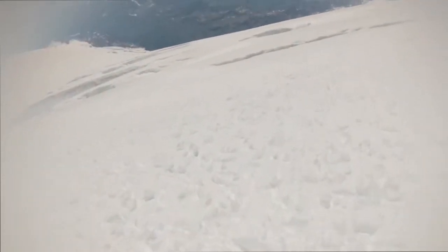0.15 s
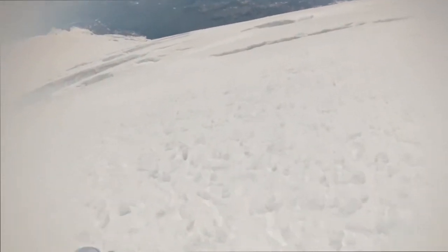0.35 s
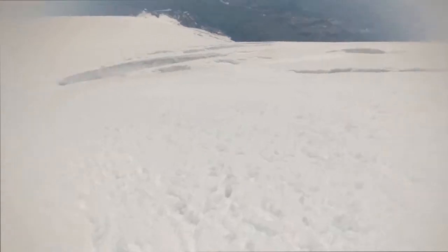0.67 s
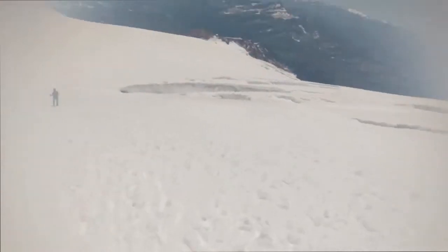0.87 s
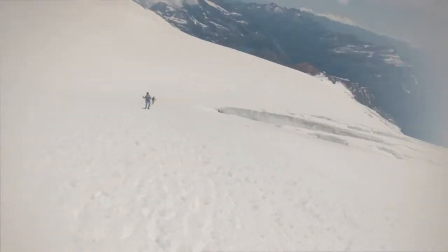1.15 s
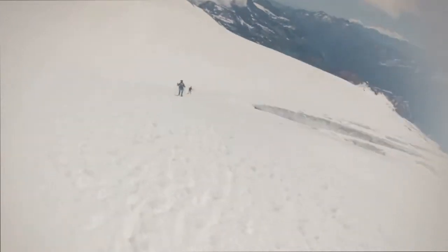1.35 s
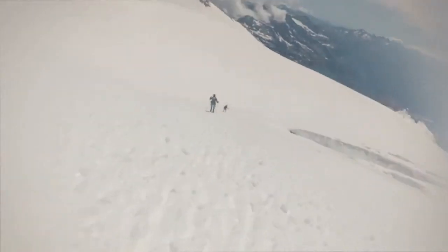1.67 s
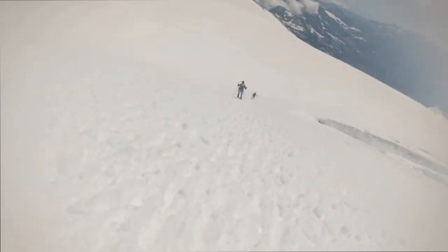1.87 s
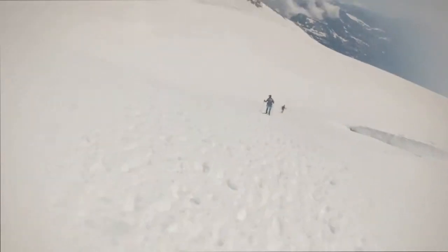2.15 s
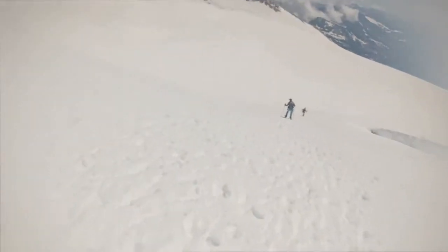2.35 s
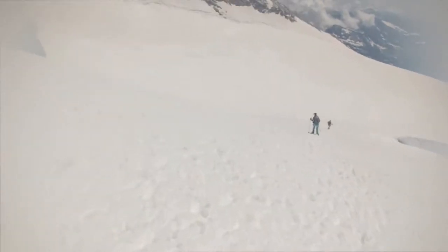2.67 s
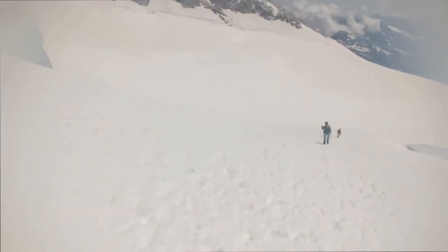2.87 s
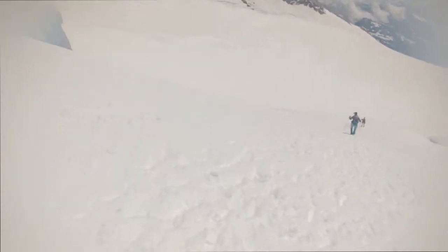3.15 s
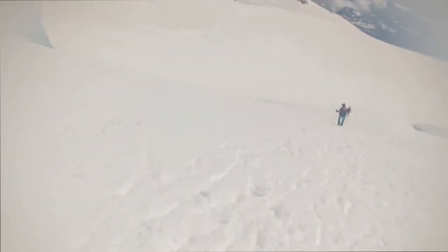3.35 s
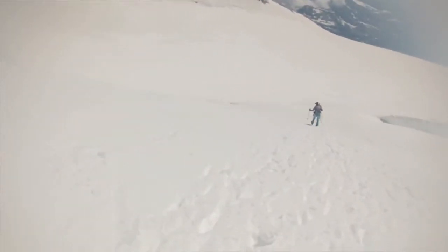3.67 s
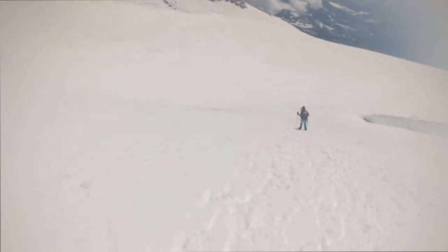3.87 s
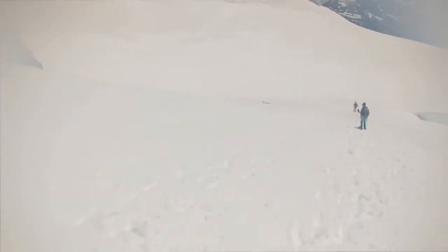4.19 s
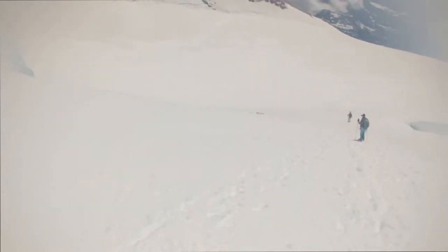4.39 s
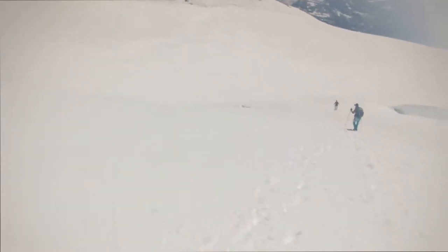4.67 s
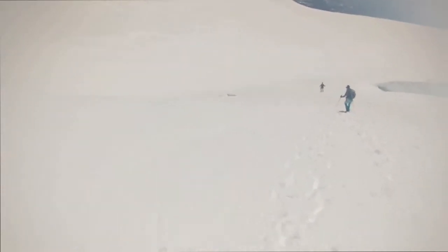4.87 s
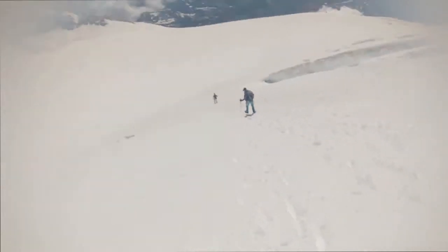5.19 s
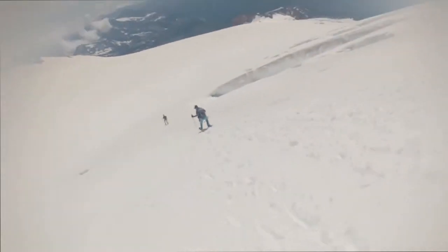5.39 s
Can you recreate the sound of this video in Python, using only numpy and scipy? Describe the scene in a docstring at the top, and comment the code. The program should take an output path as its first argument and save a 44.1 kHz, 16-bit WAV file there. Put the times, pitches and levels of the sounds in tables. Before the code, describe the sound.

Skis glide down soft snow with grainy hissing and small hollow knocks, under low wind that thumps hard during one turn.

```python
"""On soft, lumpy snow: a skier glides down with a small cased camera, its microphone close to the wind.
Filtered noise makes the low wind rumble, hardest near the end of a turn, and pulses add its buffets.
Scrapes of grainy noise mark the edges skidding; hiss and crunch are snow grains coloured by the case.
Short noise bursts, brief wavering tones and low, dull thumps stand out, most of them in the turn.
Smaller lumps knock and rattle the gear, a short hollow ring at the pitches of the case."""
import sys
import numpy as np
from scipy import signal
from scipy.fft import rfft, irfft
from scipy.io import wavfile
from scipy.ndimage import uniform_filter1d

SR = 44100
rng = np.random.default_rng(int(sys.argv[2]) if len(sys.argv) > 2 else 0)


def materialize(psi):
    """Save the field psi as 16-bit PCM at rate SR to the path in sys.argv[1].

    A 1-D psi becomes a single channel; in a 2-D psi each row is a channel.
    """
    bounded = np.clip(np.atleast_2d(psi).T, -1, 1)
    quanta = np.round(bounded * 32767).astype(np.int16)
    wavfile.write(sys.argv[1], SR, quanta)


N = 243873
TIME, FREQS = np.arange(N) / SR, np.fft.rfftfreq(N, 1 / SR)  # [s], [Hz]
SKID_SQUARENESS = 2.4  # 2 is a round swell, more is a firm bite and release

# Table levels are relative: the gain_db of a layer comes on top.
# eddies that hit the microphone head-on, suction negative:
# (time [s], peak pressure [full scale], length scale [s], roar level [dB])
EDDIES = [(1.063, 0.18, 0.012, -70), (1.264, 0.18, 0.017, -70), (1.367, -0.3, 0.012, -54.5),
          (1.403, -0.21, 0.0097, -53.5), (1.492, -0.3, 0.014, -52.5), (1.517, -0.26, .0095, -55.5),
          (1.621, -0.2, 0.018, -52), (1.67, -.25, 0.011, -59), (1.707, -0.31, 0.015, -53),
          (1.821, .27, 0.023, -48.5), (1.844, -0.19, 0.0091, -56.5), (2.621, -0.13, 0.02, -75),
          (5.36, 0.14, 0.012, -73)]
# the hardest knocks of the gear over lumps: (time [s], level [dB], ring pitch [Hz])
GEAR_KNOCKS = [(0.3223, -41, 1436), (1.256, -47.5, 1340), (1.683, -48.5, 1380), (1.7964, -39, 1346),
               (2.117, -50, 1380), (2.555, -38, 1415), (2.675, -42.5, 1397), (2.697, -47, 1370),
               (2.945, -38.5, 1375), (3.025, -45, 1370), (3.1172, -46.5, 1455), (3.3036, -43, 1360),
               (3.521, -42, 1365), (3.5955, -46, 1410), (3.909, -47, 1370), (4.153, -44, 1415),
               (4.3949, -39, 1387), (4.4394, -44, 1368), (4.6136, -43.5, 1430), (4.704, -45, 1360),
               (4.7403, -40.5, 1385), (5.017, -44, 1364), (5.1587, -46, 1410), (5.453, -49, 1370)]
# resonances of the case: (frequency [Hz], width [Hz], level [dB])
CASE_MODES = [(1158, 46, -9), (1375, 48, -0.5), (1526, 112, -7), (2054, 290, -11.5), (2363, 160, -6.5),
              (2490, 98, -29.5)]
# spectrum of the low rumble: (frequency [Hz], level [dB per Hz])
RUMBLE_SPECTRUM = [(3, -12.5), (8, 0.5), (16, -14), (25, 6.5), (38, -6), (56, -2.5), (72, -25),
                   (100, -36.5), (150, -45), (300, -64), (900, -130)]
# spectrum of hissing grains: (frequency [Hz], level [dB per Hz])
SPRAY_SPECTRUM = [(1800, -12.5), (2900, -17), (3150, -4), (3650, -12), (4000, 3), (4350, -8.5), (4800, 0),
                  (5300, 0), (5750, -9.5), (6200, -6.5), (6850, -2), (7100, -6), (7600, -5), (8800, -11),
                  (9500, -18), (10300, -26.5), (11100, -12), (12000, -29), (15000, -48.5)]
# moments when hiss and crunch dip: (time [s], dip [dB], half length [s])
HISS_DIPS = [(.88, -4.5, 0.049), (.985, -2, .012), (1.06, -6.5, 0.015), (1.224, -17, 0.016),
             (1.39, -6, 0.012), (1.617, -10, 0.011), (1.692, -14, 0.0088), (1.738, -9, 0.011),
             (1.89, -9, 0.066), (3.71, -5.5, 0.063), (5.33, -7.5, 0.075), (5.358, -20, 0.018)]
# edges skidding sideways: (time [s], scrape level [dB], spray level [dB], half length [s])
EDGE_SKIDS = [(0.22, -53.5, -75, 0.16), (0.534, -51, -90, 0.28), (1.108, -70, -65, .025),
              (1.266, -58.5, -77, 0.013), (1.455, -60, -64, .022), (1.548, -69, -61, .025),
              (1.662, -73, -52.5, 0.012), (1.813, -47.5, -53, 0.028)]


def amp(db):
    """Decibels to gain."""
    return 10 ** (np.asarray(db) / 20)


def unit(x):
    """Scales to rms 1."""
    return x / np.sqrt(np.mean(abs(x) ** 2) + 1e-20)


def level(rows):
    """A dB curve as a gain for every sample."""
    return amp(np.interp(TIME, *np.transpose(rows)))


def read(points):
    """Joins spectrum points on a log-frequency axis."""
    hz, value = np.transpose(points)
    return np.interp(np.log(FREQS + 1), np.log(hz + 1), value)


def colour(x, response):
    """Filters by a frequency response; rms 1."""
    return unit(irfft(rfft(x) * response, N))


def wobble(rate_hz):
    """Smooth random curve of rms 1, with changes mostly below the given rate."""
    return colour(rng.standard_normal(N), 1 / (1 + (FREQS / rate_hz) ** 4))


def hump(s, half_length, squareness=2):
    """A smooth swell of height 1 centred on the time s, down to 1/e at its half length."""
    away = abs((TIME - s) / half_length)
    near = away < 6
    out = np.zeros(N)
    out[near] = np.exp(-away[near] ** squareness)
    return out


def swells_db(rows):
    """Adds up smooth rises and dips in level."""
    return sum(db * hump(s, length) for s, db, length in rows)


def add(mix, s, sound):
    """Mixes a sound in at the time s."""
    part = mix[round(s * SR):][:len(sound)]
    part += sound[:len(part)]


def ports(pair):
    """Turns two unrelated signals into left and right, alike in the bass and less so in the treble."""
    # left-right likeness of the snow noise: (frequency [Hz], coherence [0-1])
    likeness = [(100, .9999), (450, 0.99), (1400, 0.99), (2400, 1), (3200, 0.96), (5000, 0.94),
                (7000, 0.78), (10000, 0.73), (15000, 0.19)]
    same = np.clip(read(likeness), 0, 1)
    mid, side = rfft(pair) * np.sqrt([(1 + same) / 2, (1 - same) / 2])
    return irfft([mid + side, mid - side], N)


def patchy(x, depth_db, size=7):
    """Turbulence and uneven snow make the bands of the spectrum flicker."""
    z = signal.stft(x, nperseg=512, noverlap=384)[2]
    field = rng.standard_normal(z.shape[1:])
    field = uniform_filter1d(field, size=size, axis=0)  # over frequency
    field = unit(uniform_filter1d(field, size=11, axis=1))  # over time
    return unit(signal.istft(z * amp(depth_db * field), nperseg=512, noverlap=384)[1][:, :N])


def wind_force():
    """The steady wind, lifted by each gust."""
    # steady wind pressure on the microphone: (time [s], level [dB])
    steady = [(0, -34.5), (.75, -33), (1.3, -26), (1.7, -29), (2.25, -31.5), (3.1, -34.5), (3.7, -37),
              (5.0, -37), (5.53, -30.5)]
    # gusts that swell the wind for a moment: (time [s], rise [dB])
    rises = [(.78, 2), (0.871, 5), (.97, 7.5), (1.22, 7), (2.0, 10), (2.899, 7), (3.371, 7), (4.08, 5),
             (4.48, 4.5), (5.21, 0), (5.35, 6.5)]
    gust_s = 0.039  # half length of a gust
    return level(steady) * amp(sum(db * hump(s, gust_s) for s, db in rises))


def wind(gain_db=1.0, steadiness=0.31, split_hz=42, usual_db=-32, deepening=0.26, surge_db=2.5):
    """Turbulent pressure, the same at both ports, coming in surges; stronger wind brings larger eddies."""
    eddies = colour(rng.standard_normal(N), amp(read(RUMBLE_SPECTRUM)))
    power = uniform_filter1d(abs(signal.hilbert(eddies)) ** 2, size=3000)
    steadied = eddies / power ** (steadiness / 2)
    eddies = unit(steadied * amp(surge_db * wobble(rate_hz=11)))
    large = irfft(rfft(eddies) / (1 + (FREQS / split_hz) ** 6), N)
    small = eddies - large
    force = wind_force()
    depth = (force / amp(usual_db)) ** deepening
    return amp(gain_db) * force * (large * depth + small / depth)


def side_rumble(gain_db=-34, top_hz=150):
    """A faint low rumble of opposite sign in the two channels."""
    shape = amp(read(RUMBLE_SPECTRUM)) * np.minimum(FREQS, top_hz) ** 2
    difference = amp(gain_db) * wind_force() * colour(rng.standard_normal(N), shape)
    return np.array([difference, -difference])


def air(gain_db=5.0, flutter_db=1.5):
    """Fine turbulence round the case: a soft fluttering rush that drops as the skier leaves the turn."""
    # spectrum of the rush: (frequency [Hz], level [dB per Hz])
    rush_spectrum = [(40, -7.5), (78, 17), (130, 5.5), (200, 5.5), (350, 1.5), (600, -2.5), (850, -7),
                     (1500, -3), (12000, -63)]
    turn_db, glide_db = -55.5, -66
    turn_end_s, ease_s = 1.7, 0.89
    rush = colour(ports(rng.standard_normal((2, N))), amp(read(rush_spectrum)))
    turning = (1 - np.tanh((TIME - turn_end_s) / ease_s)) / 2
    rush_db = glide_db + (turn_db - glide_db) * turning
    return amp(gain_db + rush_db) * patchy(rush, depth_db=flutter_db, size=4)


def gust(gain_db=4, flutter_db=2.0, strongest_db=-60, steepness=2.3, patchy_db=3, roar_s=0.024):
    """Small eddies tear at each port separately in strong wind and round each buffet: a ragged roar."""
    # spectrum of the roar at the ports: (frequency [Hz], level [dB per Hz])
    tearing = [(40, -7), (130, 8.5), (280, 8), (700, 2.5), (1500, -2.5), (2600, -2), (3300, -8.5),
               (12000, -80.5)]
    roar = patchy(colour(rng.standard_normal((2, N)), amp(read(tearing))), depth_db=patchy_db)
    force = wind_force()
    blowing = amp(strongest_db) * (force / force.max()) ** steepness
    round_buffets = sum(amp(db) * hump(s, roar_s) for s, _, _, db in EDDIES)
    fluttering = unit(roar * amp(flutter_db * wobble(rate_hz=40)))
    return amp(gain_db) * np.hypot(blowing, round_buffets) * fluttering


def lulled(x, share=0.7, above_hz=900):
    """The upper part of the rush dips along with the hiss and crunch."""
    upper = irfft(rfft(x) * (1 - 1 / (1 + (FREQS / above_hz) ** 6)), N)
    return x - upper * (1 - amp(share * swells_db(HISS_DIPS)))


def contact():
    """The level that follows the load on the skis, with brief dips."""
    # how hard the skis press on the snow: (time [s], level [dB])
    load = [(0, -62.5), (.6, -61), (1.1, -62.5), (1.5, -60.5), (1.95, -59.5), (2.15, -59.5), (3.4, -59),
            (4.0, -62.5), (4.4, -59.5), (5.3, -63), (5.53, -61.5)]
    return level(load) * amp(swells_db(HISS_DIPS))


def case_response():
    """Sum of the resonances of the case."""
    return sum(amp(db) / (1 + 1j * (FREQS - hz) / (width / 2)) for hz, width, db in CASE_MODES)


def grains(per_s, spread_db, smooth):
    """Snow grains breaking: clicks of uneven size over a smooth share of tiny ones."""
    size = amp(spread_db * np.minimum(rng.exponential(1, (2, N)), 4))
    sign = rng.choice([-1, 1], (2, N))
    clicks = size * sign * (rng.random((2, N)) < per_s / SR)
    return unit(clicks) + smooth * rng.standard_normal((2, N))


def crunch(lumps, gain_db=3.0, lumpy_db=2.0, patchy_db=1.4):
    """Crushed snow shakes the skis in clumps, and the case rings along."""
    drive = grains(per_s=700, spread_db=1.5, smooth=1.0) * amp(lumpy_db * lumps)
    body = colour(ports(drive), case_response())
    return amp(gain_db) * contact() * patchy(body, depth_db=patchy_db)


def spray(lumps, gain_db=4.0, lumpy_db=0.2, patchy_db=2.5, share_db=-5):
    """Loose grains hiss off the ski bases, coloured by the case; skids throw up more."""
    drive = grains(per_s=5400, spread_db=5.0, smooth=1.0) * amp(lumpy_db * lumps)
    hiss = patchy(colour(ports(drive), amp(read(SPRAY_SPECTRUM))), depth_db=patchy_db, size=3)
    thrown = sum(amp(db) * hump(s, length, SKID_SQUARENESS) for s, _, db, length in EDGE_SKIDS)
    return amp(gain_db) * np.hypot(amp(share_db) * contact(), thrown) * hiss


def dulled(x, pressure, calm_db=-33, depth=1.29, from_hz=2200, full_hz=9000, flicker_db=2.0):
    """The top of the hiss flickers, and fades briefly whenever the rumble surges."""
    hz, t, z = signal.stft(x, SR, nperseg=256)
    rumble_db = 10 * np.log10(abs(uniform_filter1d(pressure ** 2, size=1600)) + 1e-12)
    excess_db = np.maximum(np.interp(t, TIME, rumble_db) - calm_db, 0)
    flicker = flicker_db * np.interp(t, TIME, wobble(rate_hz=21.4))
    share = np.clip((hz[:, None] - from_hz) / (full_hz - from_hz), 0, 1)
    change_db = share ** 2 * flicker - depth * share * excess_db
    return signal.istft(z * amp(change_db), SR, nperseg=256)[1][:, :N]


def skid(gain_db=4, chatter_db=2.0):
    """The edges shave the snow with a grainy scrape, and the skis shudder."""
    # spectrum of the scrape: (frequency [Hz], level [dB per Hz])
    scrape = [(50, 15), (100, 20.5), (200, 7), (400, -1), (600, 2.5), (850, -17.5), (1150, -0.5), (1450, 4),
              (1650, -3), (1930, 9.5), (2200, -5), (2550, -1.5), (2850, -22), (3600, -8.5), (12000, -68)]
    drive = grains(per_s=1200, spread_db=1.0, smooth=0.77)[0] * amp(chatter_db * wobble(rate_hz=12.4))
    edging = sum(amp(db) * hump(s, length, SKID_SQUARENESS) for s, db, _, length in EDGE_SKIDS)
    return amp(gain_db) * edging * colour(drive, amp(read(scrape)))


def ring(hz, swell_s, upper_db=-17):
    """A soft knock: the hollow ring of the case swells for a few cycles and dies."""
    t = np.arange(2048) / SR
    swell = (t / swell_s * np.exp(1 - t / swell_s)) ** 2  # peaks at swell_s
    upper_hz = CASE_MODES[4][0]
    return swell * (np.sin(2 * np.pi * hz * t) + amp(upper_db) * np.sin(2 * np.pi * upper_hz * t))


def rattle(lumps, gain_db=-4, per_s=700, lumpy_db=1, swell_s=0.0027):
    """Small lumps keep the gear chattering on three low case modes, harder over rough stretches."""
    # rough stretches: (time [s], rise [dB], half length [s])
    shakes = [(2.14, 11, 0.028), (2.26, 7.5, 0.09), (2.98, 11, 0.08), (3.48, 7, 0.25), (3.79, 15, 0.017),
              (3.87, 14.5, 0.026), (4.19, 12, 0.062), (4.89, 6, 0.031), (5.51, 13.5, 0.015)]
    out = np.zeros(N)
    for hz, _, db in CASE_MODES[:3]:
        taps = amp(db + lumpy_db * lumps) * (rng.random(N) < per_s / 3 / SR)
        out += signal.oaconvolve(taps, ring(hz, swell_s))[:N]
    return amp(gain_db + swells_db(shakes)) * contact() * unit(out)


def knocks(gain_db=-1, lead_s=0.001193, swell_s=0.004, rebound_s=.013, rebound_db=-10, detune=0.028):
    """Large lumps knock the gear, which rebounds once at a slightly shifted pitch."""
    out = np.zeros(N)
    chances = rng.uniform(-0.996, 1, (len(GEAR_KNOCKS), 2))
    for (s, db, hz), (late, shift) in zip(GEAR_KNOCKS, chances):
        add(out, s - lead_s, amp(db) * ring(hz, swell_s))
        rebound = amp(db + rebound_db) * ring(hz * (1 + detune * shift), swell_s)
        add(out, s + rebound_s * (1 + late / 2), rebound)
    return amp(gain_db) * out


def scuffs(gain_db=-13, half_length_s=0.016):
    """Each lump that knocks the gear also scuffs along the ski bases."""
    rubbing = sum(amp(db) * hump(s + half_length_s / 2, half_length_s) for s, db, _ in GEAR_KNOCKS)
    return amp(gain_db) * rubbing * colour(rng.standard_normal(N), case_response())


def crumbs(gain_db=-8, length_s=0.0088):
    """Icy crumbs crushed under an edge give way with a short bright scratch."""
    # crushed crumbs: (time [s], level [dB])
    icy = [(0.475, -49), (1.796, -42.5), (3.391, -46.5), (5.155, -54)]
    scratches = sum(amp(db) * hump(s + length_s / 2, length_s) for s, db in icy)
    return amp(gain_db) * scratches * colour(ports(rng.standard_normal((2, N))), amp(read(SPRAY_SPECTRUM)))


def bursts(gain_db=-6.0, attack_s=0.00066, decay_s=0.003):
    """Short noise bursts with a sharp attack and a quick decay; the first is a lone click."""
    # bursts, most of them in the turn: (time [s], level [dB])
    burst_times = [(0.683, -35), (1.346, -41), (1.365, -36.5), (1.456, -33.5), (1.465, -35.5), (1.486, -41),
                   (1.543, -37.5), (1.655, -43), (1.706, -35), (1.819, -28.5), (1.838, -38), (2.946, -38),
                   (4.74, -46)]
    # spectrum of the bursts: (frequency [Hz], level [dB per Hz])
    burst_spectrum = [(150, -11), (400, 3.5), (1450, -5), (2450, -2), (3000, -18), (5200, -15.5),
                      (12000, -39.5)]
    envelope = np.zeros(N)
    for s, db in burst_times:
        age = np.maximum(TIME - s + attack_s, 0)
        envelope += amp(db) * (1 - np.exp(-age / attack_s)) * np.exp(-age / decay_s)
    return amp(gain_db) * envelope * colour(ports(rng.standard_normal((2, N))), amp(read(burst_spectrum)))


def buffets():
    """The core of a passing eddy pushes or sucks at the microphone: a peak between opposite shoulders."""
    out = np.zeros(N)
    for s, peak, length, _ in EDDIES:
        u = (TIME - s) / length
        out += peak * (1 - 2 * u ** 2) * np.exp(-u ** 2 / 2) / (1 + 2 * u ** 2)
    return out


def swept(share=0.48, half_length_s=0.0098):
    """Each large eddy sweeps the ordinary turbulence aside as it passes."""
    return 1 - share * np.max([hump(row[0], half_length_s) for row in EDDIES], axis=0)


def thuds(pitch_hz=115, attack_s=0.0078, body_db=-13, body_s=0.031, body_hz=145):
    """The hardest blows thump the case: one heavy shove in a brief, dull shudder."""
    # heavy blows in the turn: (time [s], level [dB])
    blows = [(1.367, -35.5), (1.401, -37), (1.518, -28), (1.67, -48), (1.706, -37), (1.825, -30.5)]
    out = np.zeros((2, N))
    ratio = FREQS / body_hz
    shudder = colour(ports(rng.standard_normal((2, N))), ratio ** 3 / (1 + ratio ** 7))
    for s, db in blows:
        shove = -hump(s, attack_s) * np.cos(2 * np.pi * pitch_hz * (TIME - s))
        out += amp(db) * (shove + amp(body_db) * hump(s, body_s) * shudder)
    return out


def short_tones(half_length_s=0.0034, waver=0.033):
    """Brief wavering tones, some of them high and thin."""
    # short tones in the turn: (time [s], level [dB], pitch [Hz])
    tones = [(1.369, -46, 1500), (1.386, -48, 830), (1.403, -51, 1770), (1.506, -52, 3520),
             (1.519, -49.5, 3570), (1.519, -54, 3090), (1.542, -51, 2470)]
    clock = np.cumsum(1 + waver * wobble(rate_hz=530)) / SR  # time that runs unevenly
    out = np.zeros(N)
    for s, db, hz in tones:
        out += amp(db) * hump(s, half_length_s) * np.sin(2 * np.pi * hz * clock)
    return out


def scene():
    """Wind at the microphone over the skis; the same lumps stir crunch, spray and rattle."""
    lumps = wobble(rate_hz=25.0)
    pressure = wind() * swept() + buffets()
    glide = dulled(crunch(lumps) + spray(lumps), pressure)
    hits = thuds() + knocks() + scuffs() + bursts() + crumbs() + short_tones()
    rush = lulled(air() + gust())
    return pressure + side_rumble() + rush + glide + skid() + rattle(lumps) + hits


def record(dry):
    """The band limit of the recorder: a steep low-pass."""
    edge_hz = 15200
    low_pass = signal.firwin(511, edge_hz, window=("kaiser", 9), fs=SR)
    return signal.oaconvolve(dry, low_pass[None], "same")


dry = scene()
out = record(dry)
materialize(out)
```